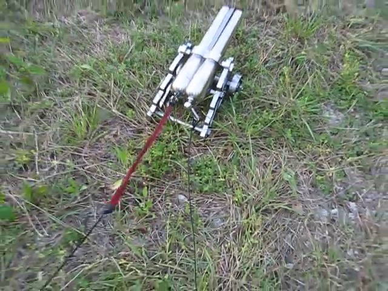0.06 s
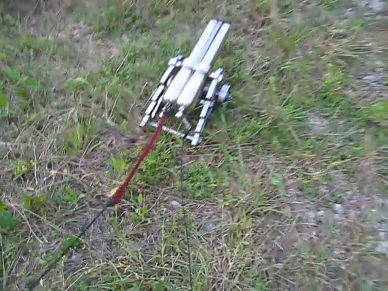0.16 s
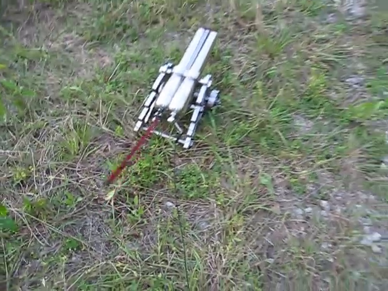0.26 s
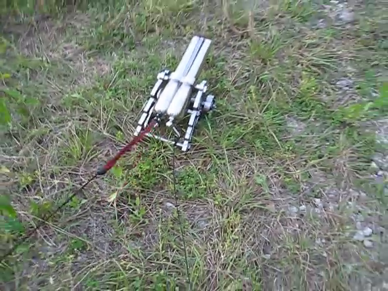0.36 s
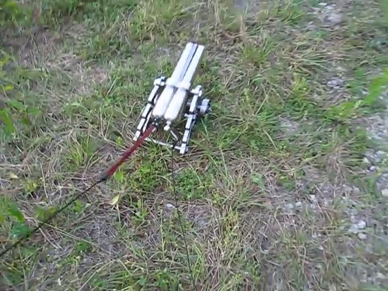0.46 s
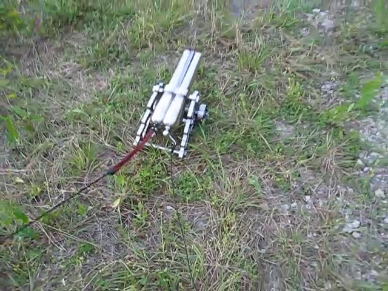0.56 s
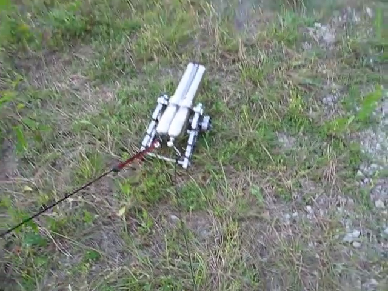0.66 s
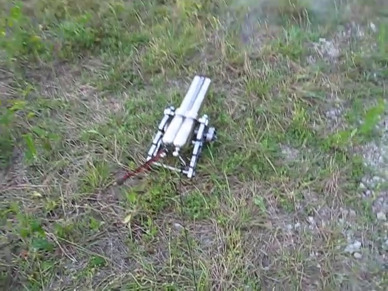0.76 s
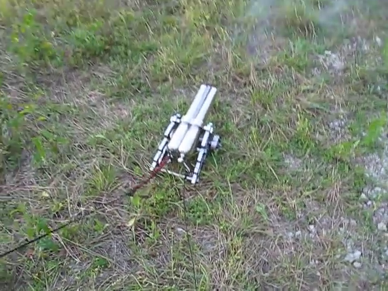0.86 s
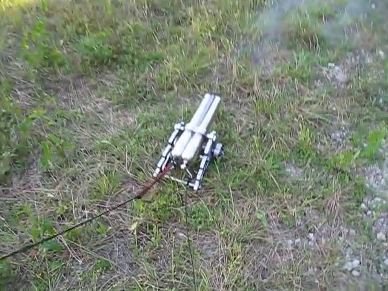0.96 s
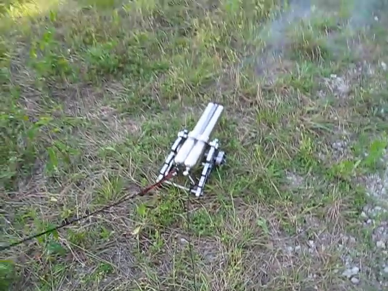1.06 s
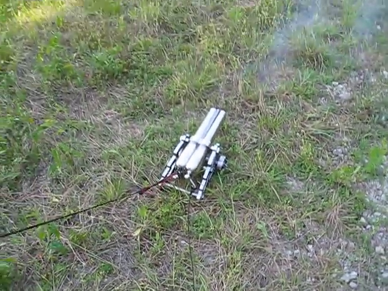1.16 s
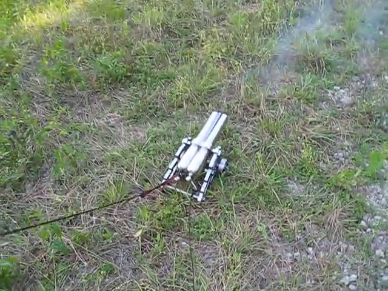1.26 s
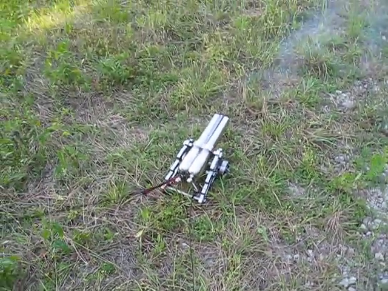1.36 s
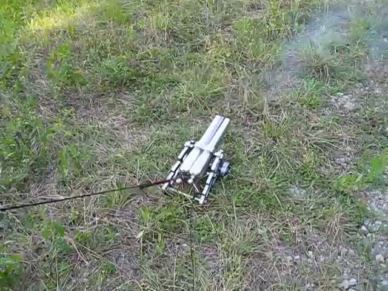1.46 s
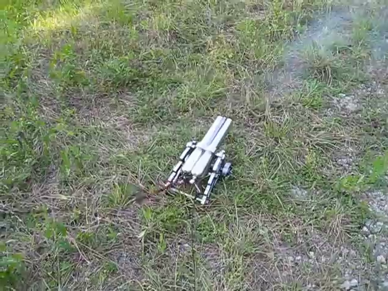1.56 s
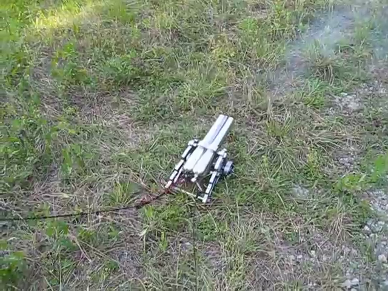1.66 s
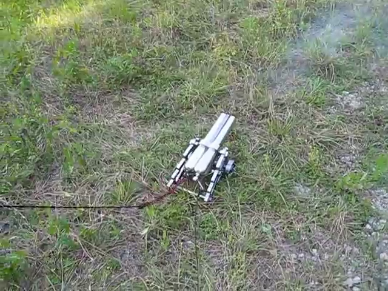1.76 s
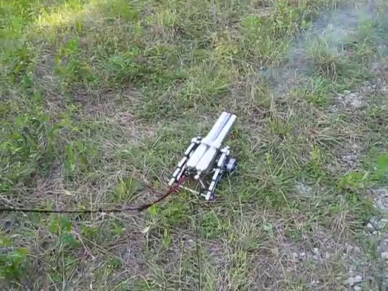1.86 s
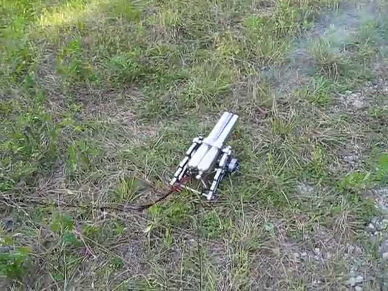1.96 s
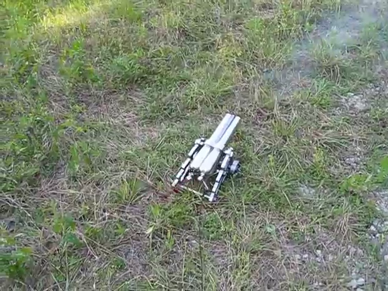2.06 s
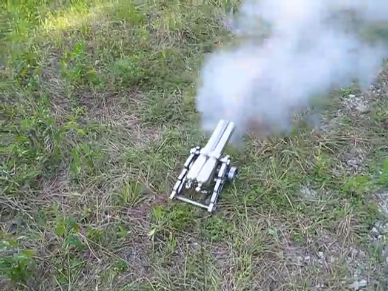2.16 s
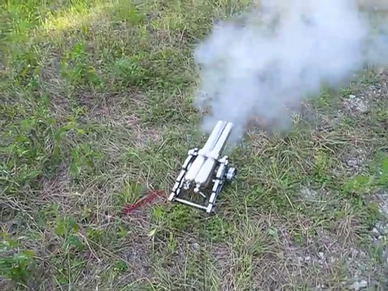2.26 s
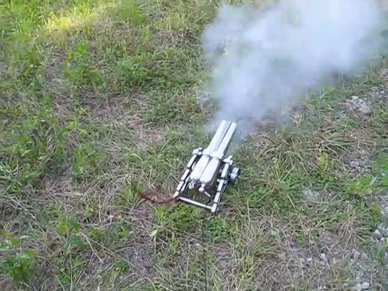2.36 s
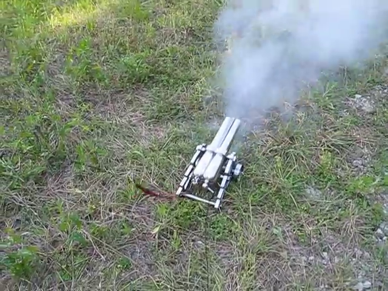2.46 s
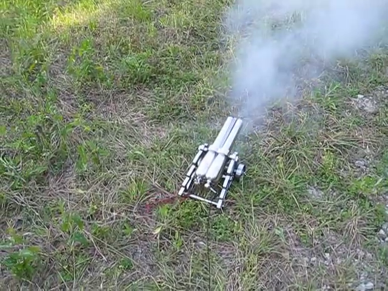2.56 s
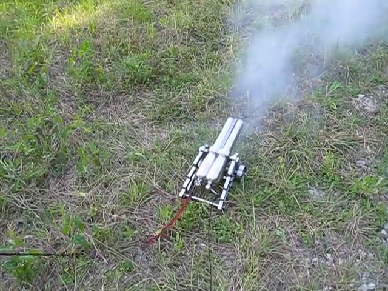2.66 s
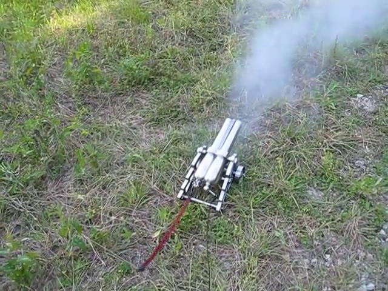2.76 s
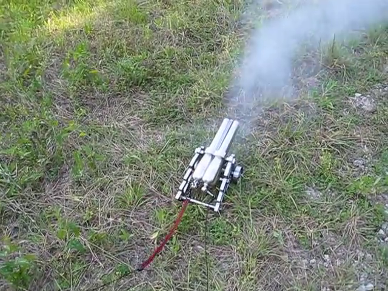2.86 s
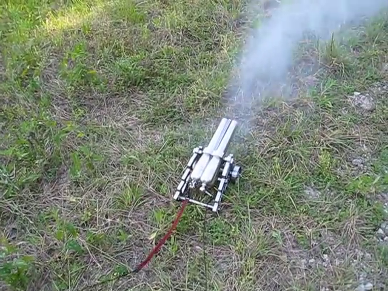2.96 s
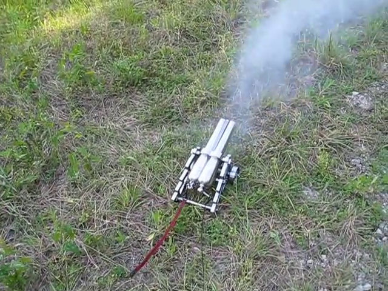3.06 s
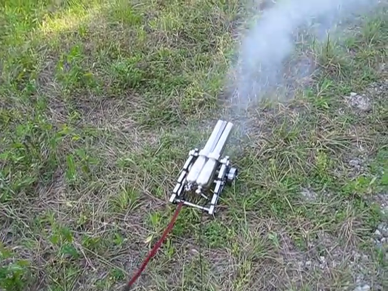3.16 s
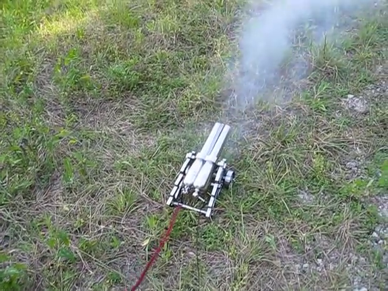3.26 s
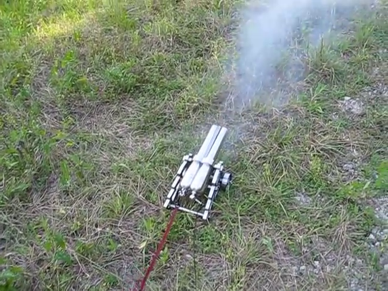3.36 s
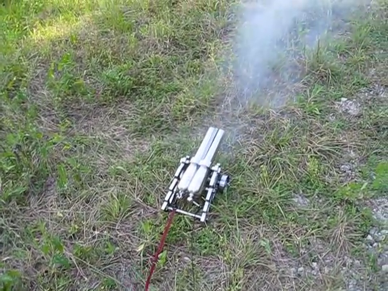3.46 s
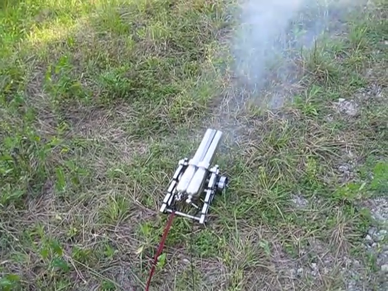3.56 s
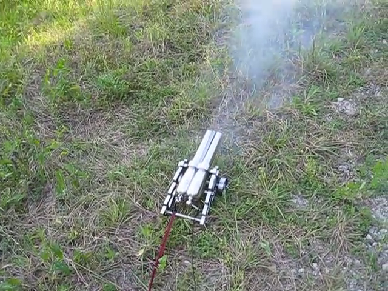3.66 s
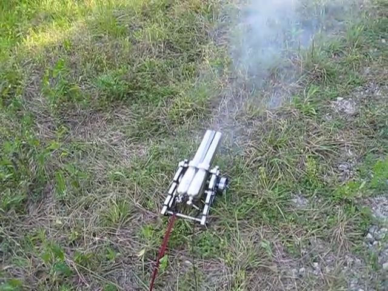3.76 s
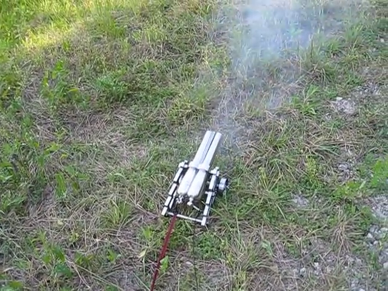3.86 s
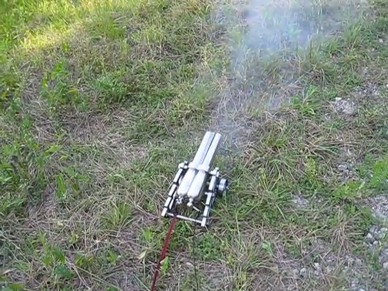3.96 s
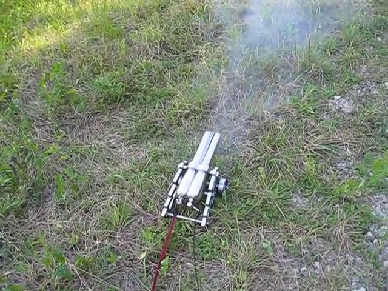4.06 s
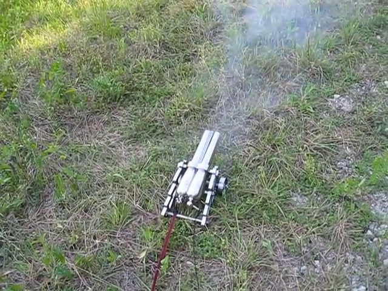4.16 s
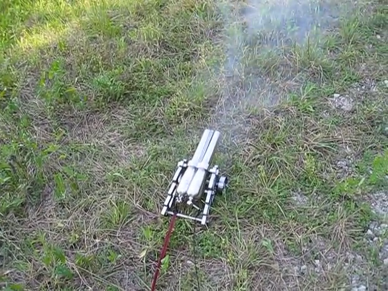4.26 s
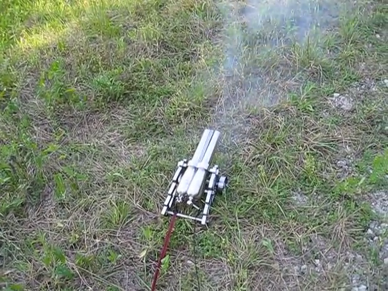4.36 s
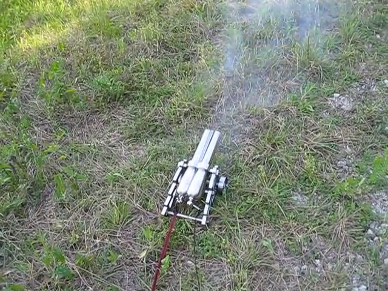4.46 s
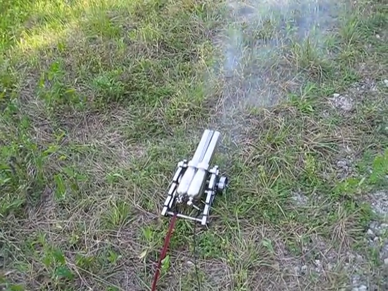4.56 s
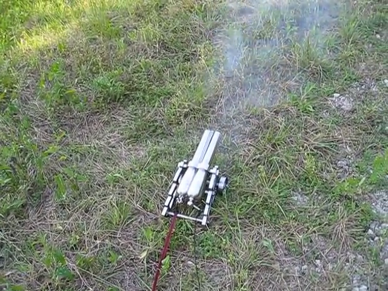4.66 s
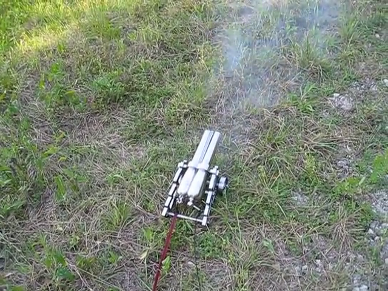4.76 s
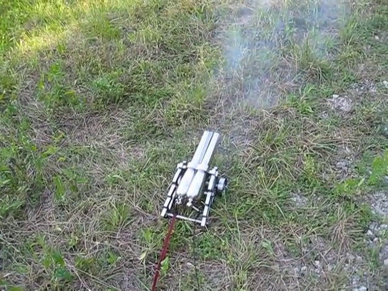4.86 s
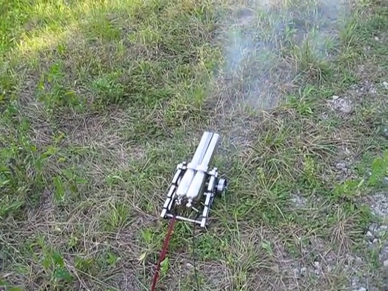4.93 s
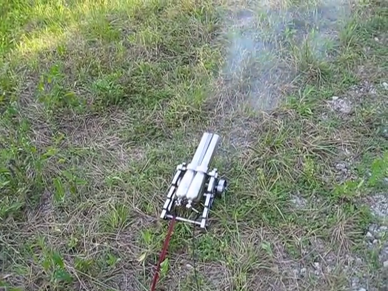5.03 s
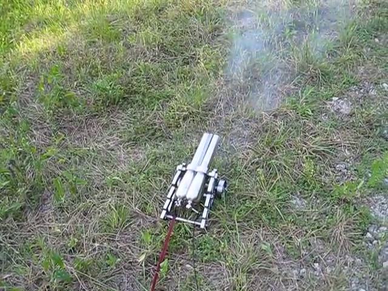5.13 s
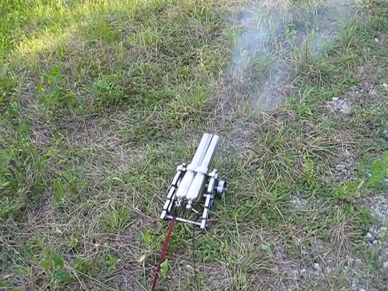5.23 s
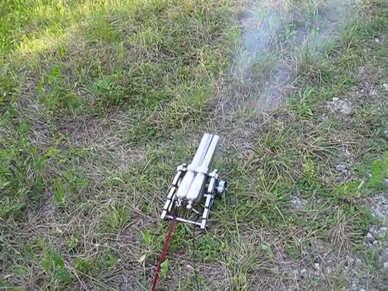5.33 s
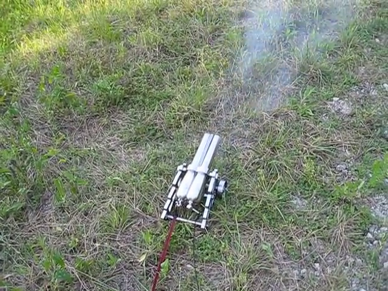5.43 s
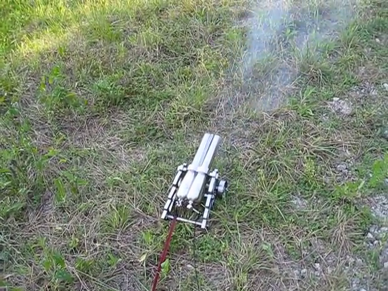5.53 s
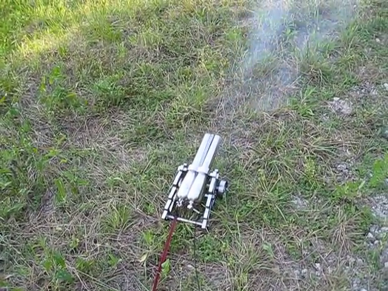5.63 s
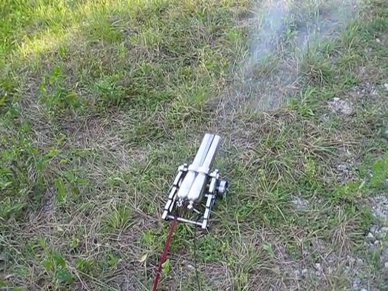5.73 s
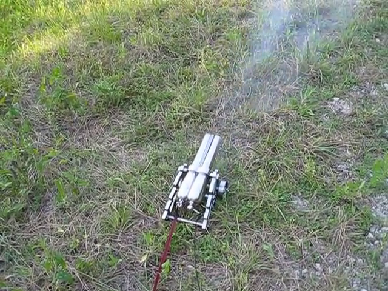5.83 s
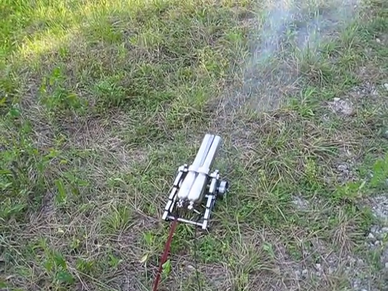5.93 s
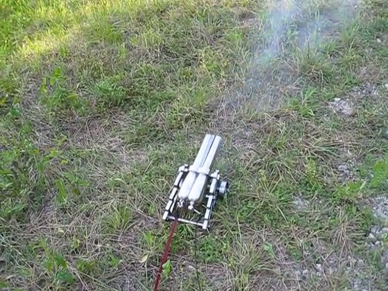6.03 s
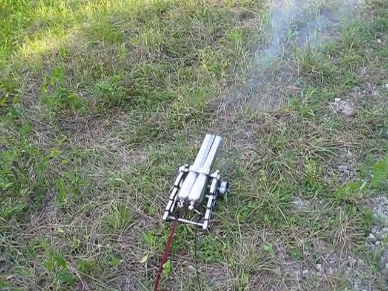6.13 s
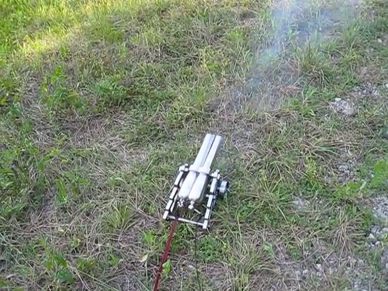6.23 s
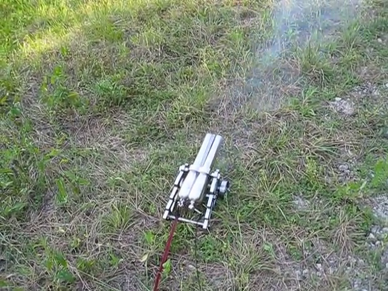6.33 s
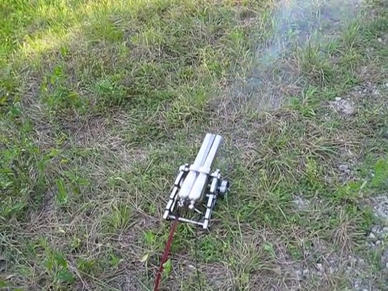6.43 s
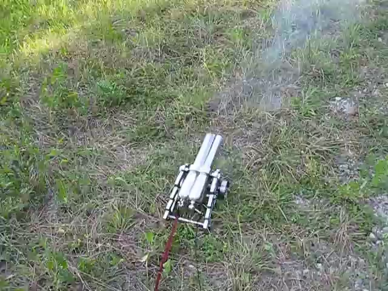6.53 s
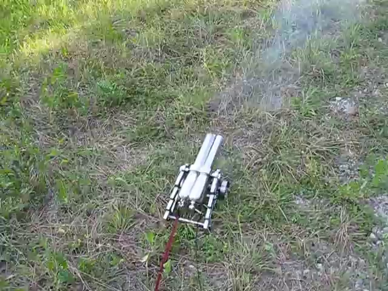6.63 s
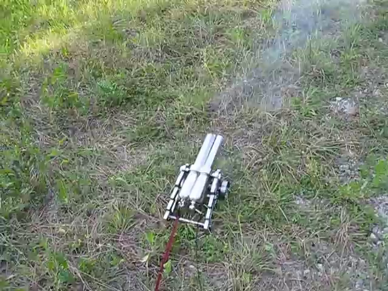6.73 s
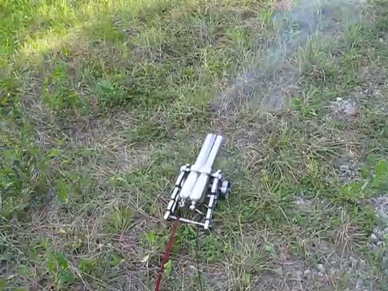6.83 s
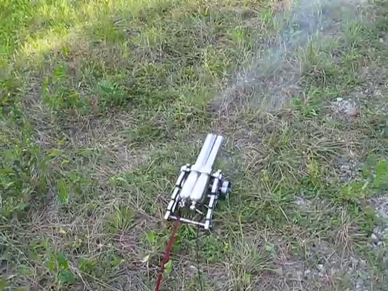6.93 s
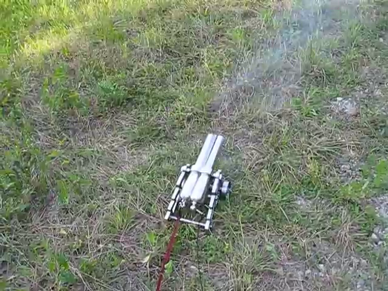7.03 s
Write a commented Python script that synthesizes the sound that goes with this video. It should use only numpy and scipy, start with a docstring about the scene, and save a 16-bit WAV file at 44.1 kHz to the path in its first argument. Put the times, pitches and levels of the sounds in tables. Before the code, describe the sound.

Light clicks and footsteps in grass precede a small cannon's single loud blast, followed by a long rushing echo and faint birds.

```python
"""A hand-held camera clicks and bumps over an outdoor hush as its holder backs away through grass.
Faint birds call. At 2.1 s a small black-powder cannon fires a blank a few steps off: a shock front,
a jet of gas and a ringing barrel. The bang overloads the microphone, then rolls back from the
surrounding trees for two seconds, ever duller. The camera's casing snaps once as the roll fades."""
import sys
import numpy as np
from scipy import signal
from scipy.fft import rfft, irfft
from scipy.io import wavfile
from scipy.ndimage import uniform_filter1d

SR = 44100
rng = np.random.default_rng(int(sys.argv[2]) if len(sys.argv) > 2 else 0)


def unload_audio(sound):
    """Save the sound as a 16-bit wav file, at the path given as the first command line argument."""
    columns = np.transpose(np.atleast_2d(sound))
    # keep every value between -1 and 1, then stretch to whole-number steps
    steps = np.round(np.clip(columns, -1, 1) * 32767)
    wavfile.write(sys.argv[1], SR, steps.astype(np.int16))


N = 312624
T = np.arange(N) / SR
HZ = np.maximum(np.arange(N // 2 + 1) * SR / N, 1)
SHOT_S, TREELINE_S, TREELINE_RISE_S, CREST_S = 2.1062, 2.213, 0.006, 3.157


def undb(db):
    """Decibels to gain."""
    return 10 ** (np.asarray(db) / 20)


def unit(x):
    """Scale to rms 1."""
    return x / np.sqrt(np.mean(x ** 2))


def fade(t, t60_s):
    """Silent before t = 0, then exponential decay."""
    return (t >= 0) * np.exp(-np.log(1000) * np.maximum(t, 0) / t60_s)


def release(t, t60_s):
    """Full level until t = 0, then exponential decay."""
    return fade(np.maximum(t, 0), t60_s)


def onset(t, rise_s):
    """Smooth step from 0 to 1 around t = 0."""
    return (1 + np.tanh(t / rise_s / 2)) / 2


def swell(at_s, half_width_s):
    """Gaussian bump of height 1."""
    return np.exp(-((T - at_s) / half_width_s) ** 2)


def walk(rate_hz):
    """Smooth random wander, rms 1."""
    hop = max(int(SR / rate_hz), 1)
    knots = rng.standard_normal(N // hop + 2)
    path = np.interp(np.arange(N) / hop, np.arange(len(knots)), knots)
    return unit(uniform_filter1d(path, hop // 2 + 1))


def colour(x, spectrum):
    """Shape a white signal to (f/Hz, level/dB) points; rms 1."""
    hz, db = np.transpose(spectrum)
    gain = undb(np.interp(np.log(HZ), np.log(hz), db))
    skirts = np.minimum(HZ / hz[0], 1) ** 2 * np.minimum(hz[-1] / HZ, 1) ** 2
    return unit(irfft(rfft(x) * gain * skirts, N))


def noise(spectrum):
    """Coloured noise, rms 1."""
    return colour(rng.standard_normal(N), spectrum)


def friction(grain):
    """White noise, spikier with more grain."""
    return rng.standard_normal(N) * np.exp(grain * rng.standard_normal(N))


def bands(x, count=18):
    """Overlapping bands that sum to x: (centre/Hz, signal)."""
    centres_hz, spectrum = np.geomspace(60, 17000, count), rfft(x)
    weights = (np.interp(np.log(HZ), np.log(centres_hz), row) for row in np.eye(count))
    return [(hz, irfft(spectrum * weight, N)) for hz, weight in zip(centres_hz, weights)]


def resonance(hz, width_hz):
    """Response of one resonance, gain 1 at its centre."""
    return 1 / (1 + 1j * (HZ / hz - hz / HZ) * hz / width_hz)


def highpass(x, hz, order=4):
    """Butterworth bass cut."""
    return signal.sosfilt(signal.butter(order, hz, "high", fs=SR, output="sos"), x)


def knock(at_s, db, hz, crack_db, t60_s, crack_t60_s, rise_s):
    """A brief crack and one heavily damped ring."""
    out, t = np.zeros(N), T[:SR // 5]
    ring = np.sin(2 * np.pi * hz * t) * fade(t, t60_s) * (1 - np.exp(-t / rise_s))
    crack = undb(crack_db) * rng.standard_normal(len(t)) * fade(t, crack_t60_s)
    start = int(at_s * SR)
    out[start:start + len(t)] = (undb(db) * (2 * ring + crack))[:N - start]
    return out


# Outdoor hush: f/Hz, level/dB
HUSH_SPECTRUM = [(25, -4), (60, -2), (100, 0), (160, -5), (320, -5.5), (520, -1.5), (760, 0.5),
                 (1100, -0.5), (1450, -7.5), (1900, -7.5), (3400, -16), (6000, -19), (10400, -23.5),
                 (17000, -33)]

def hush(level_db=-41.7, flicker_db=0.83):
    """Far traffic and leaves: a steady wash whose bands flicker independently."""
    return sum(band * undb(level_db + flicker_db * walk(9)) for _, band in bands(noise(HUSH_SPECTRUM)))


# Calls: t/s, length/s, start f/Hz, middle f/Hz, end f/Hz, level/dB, roughness/0-1, swell/dB
BIRD_CALLS = [(1.005, .085, 1940, 2080, 1880, -41.5, .35, 0), (1.07, .21, 1890, 1980, 1920, -45, .6, -4),
              (1.53, .18, 3050, 3000, 2800, -53, .9, 0), (1.61, .07, 1900, 1810, 1760, -48.5, .6, 0),
              (4.725, .24, 2490, 2460, 2300, -49, .2, -6), (4.72, .2, 3400, 3310, 3170, -53, .3, 0),
              (4.88, .16, 3200, 3090, 2840, -43.5, .2, 7), (5.26, .11, 2480, 2520, 2470, -49.5, .3, 0),
              (5.41, .18, 3200, 3060, 2780, -52, .3, 4), (5.97, .24, 3020, 2950, 2880, -52, .6, 0)]

def birds(waver=0.052, flutter_db=3):
    """Distant, thin slurred calls; fast pitch jitter makes some hoarse."""
    out, jitter, flutter = np.zeros(N), waver * walk(400), undb(flutter_db * walk(70))
    for at_s, length_s, start_hz, middle_hz, end_hz, db, roughness, swell_db in BIRD_CALLS:
        span = slice(int(at_s * SR), int((at_s + length_s) * SR))
        progress = np.linspace(0, 1, span.stop - span.start)
        slur = np.polyfit([0, 0.5, 1], [start_hz, middle_hz, end_hz], 2)
        hz = np.polyval(slur, progress) * (1 + roughness * jitter[span])
        arch = np.sqrt(np.abs(np.sin(np.pi * progress)))
        out[span] += undb(db + swell_db * (progress - 0.5)) * arch * np.sin(2 * np.pi * np.cumsum(hz) / SR)
    return out * unit(flutter)


# Rustles and scuffs, plus one bright treble burst returned from near trees at 2.677 s: t/s, half-width/s, f/Hz,
# bandwidth/Hz, level/dB
SCUFFS = [(0.734, 0.019, 764, 950, -33), (2.677, 0.013, 3200, 2600, -26.5),
          (3.612, 0.017, 4700, 5970, -39.5), (3.75, .06, 4200, 3500, -49.5),
          (5.934, 0.0069, 3650, 900, -44), (5.956, .005, 3730, 900, -45), (6.198, .009, 1500, 1100, -37.5)]

def rustles():
    """Brief swells of grainy friction, each around its own pitch; the one at 2.677 s is a bright burst of
    treble thrown back by the near trees."""
    spectrum = rfft(friction(grain=0.31))
    return sum(unit(irfft(spectrum * resonance(hz, width_hz) ** 2, N)) * undb(db) * swell(at_s, half_s)
               for at_s, half_s, hz, width_hz, db in SCUFFS)


# Footfalls: t/s, level/dB, rise/s, t60/s
FOOTFALLS = [(.06, -23, .007, 0.1), (.2, -28, 0.018, .14), (.495, -27, 0.036, 0.32),
             (1.51, -40, 0.098, .65)]
# Footfall thud: f/Hz, level/dB
THUD_SPECTRUM = [(25, -4), (60, 2.5), (110, 1.5), (200, -3.5), (330, -11), (600, -21)]
# Feet brushing grass: t/s, length/s, level/dB
GRASS_SWISHES = [(0.052, 0.028, -39), (0.102, 0.22, -53), (.32, 0.447, -47), (.655, 0.02, -45)]
# Brushed grass: f/Hz, level/dB
GRASS_SPECTRUM = [(1200, 10.5), (2500, 6.5), (5000, -4.5), (10000, 0), (16000, -9)]

def footwork(shuffle_db=-47, shuffle_end_s=0.74, swish_rise_s=0.012, stop_t60_s=0.13):
    """Feet shuffle backwards, thud softly and brush through dry grass."""
    thuds = sum(undb(db) * np.exp(np.minimum(T - at_s, 0) / rise_s) * release(T - at_s, t60_s)
                for at_s, db, rise_s, t60_s in FOOTFALLS)
    shuffle = undb(shuffle_db) * release(T - shuffle_end_s, stop_t60_s)
    swishes = sum(undb(db) * onset(T - at_s, swish_rise_s) * release(T - at_s - length_s, stop_t60_s)
                  for at_s, length_s, db in GRASS_SWISHES)
    blades = colour(friction(grain=0.89), GRASS_SPECTRUM)
    return noise(THUD_SPECTRUM) * np.hypot(thuds, shuffle) + blades * swishes


# Hand and foot bumps: t/s, level/dB, f/Hz
SOFT_BUMPS = [(0.0538, -14, 168), (.062, -16.5, 332), (0.2019, -16, 230), (0.349, -28, 109),
              (.494, -17.5, 186), (.550, -24, 246)]

def bumps(ring_cycles=4.3):
    """Soft contacts of hand and feet: low rings, little crack."""
    return sum(knock(at_s, db, hz, crack_db=-33, t60_s=ring_cycles / hz, crack_t60_s=0.02, rise_s=0.0018)
               for at_s, db, hz in SOFT_BUMPS)


# Camera body clicks: t/s, level/dB, f/Hz, relative crack/dB
BODY_CLICKS = [(.0785, -23, 600, -14), (.0853, -16.5, 600, -9), (.1025, -20, 1100, -20),
               (.1153, -2, 930, -7), (.1154, -13, 2010, -22), (.1775, -5.5, 1160, -34),
               (.1885, -20, 1200, -27), (.1955, -22, 1100, -25), (.2095, -21, 1300, -22),
               (.3315, -13, 1030, -12), (.3668, -22, 850, -18), (.7840, -19, 1030, -22),
               (.9518, -11.5, 1780, -17), (.9529, -15, 740, -20), (.9920, -20, 1010, -25),
               (6.3236, -37, 5000, 10.5)]

def camera_clicks(ring_cycles=5.24):
    """The plastic body clicks, too small to radiate bass."""
    clicks = sum(knock(at_s, db, hz, crack_db, ring_cycles / hz, crack_t60_s=0.0014, rise_s=0.0003)
                 for at_s, db, hz, crack_db in BODY_CLICKS)
    return highpass(clicks, hz=298)


# Casing modes: f/Hz, level/dB, t60/s
CASING_MODES = [(1650, -3.5, .004), (2000, -17, .014), (1400, -20, .014), (3700, -15, .006),
                (5000, -26, .004), (6200, -30, .004)]

def casing_snap(at_s=4.0535, crack_db=-31):
    """A small stiff part of the casing flips and rings."""
    ring = sum(knock(at_s, db, hz, crack_db, t60_s, crack_t60_s=0.003, rise_s=0.0003)
               for hz, db, t60_s in CASING_MODES)
    return highpass(ring, hz=1150)


# Echo bass: f/Hz, level/dB
RUMBLE_SPECTRUM = [(25, -28), (50, -9), (90, 2.5), (150, 0), (230, -1), (320, -8), (450, -17.5)]

def rumble(scatter, treeline, booms):
    """Bass of the echoes: a plateau until the crest, a few booms, a long tail."""
    body = undb(-34) * release(T - CREST_S, t60_s=2.6)
    tail = undb(-37.5) * release(T - CREST_S, t60_s=7.7)
    return colour(scatter, RUMBLE_SPECTRUM) * np.hypot(np.hypot(body, tail) * treeline, booms)


# Echoes off trees: f/Hz, level/dB
TREE_SPECTRUM = [(300, -10), (420, -5), (600, 3), (850, 3), (1200, 1.5), (1450, -3), (1900, -1),
                 (2250, -5.5), (2900, -4), (3600, -10.5), (5000, -12.5), (8000, -13), (12000, -21.5),
                 (17000, -19.5)]

def tree_rush(scatter, age_s, near_db=3, far_db=-3, far_wood_s=2.835, air_db_per_s=17, flicker_db=0.27):
    """Near trees return more treble than the far wood; air absorbs more with path and frequency."""
    treble_db = near_db + (far_db - near_db) * onset(T - far_wood_s, rise_s=0.18)
    rush = 0
    for hz, band in bands(colour(scatter, TREE_SPECTRUM)):
        lift_db = treble_db * np.clip(np.log(hz / 900), 0, 1)
        loss_db = air_db_per_s * age_s * (hz / 5000) ** 1.68
        rush += band * undb(lift_db - loss_db + flicker_db * walk(27.9))
    return rush


# Tree clumps answering together: t/s, half-width/s, boom level/dB, rush lift/dB
TREE_CLUMPS = [(2.347, .012, -31, 1.5), (2.448, 0.032, -37.5, 1.5), (2.648, 0.051, -27, 0),
               (2.815, .03, -25, 2), (2.979, 0.022, -25, 1.5), (3.6, .03, -38, 1)]

def echo_roll(echoes_per_s=9000, swell_db_per_s=7, fall_db_per_s=23, wander_db=0.5):
    """The field scatters the bang, then countless trees return it: a swell, a crest, a lingering fall."""
    age_s, past_crest_s = np.maximum(T - SHOT_S, 0), T - CREST_S
    treeline = onset(T - TREELINE_S, TREELINE_RISE_S)
    field = undb(-21.5) * fade(age_s, t60_s=1)
    crest = undb(-11) / np.hypot(undb(-swell_db_per_s * past_crest_s), undb(fall_db_per_s * past_crest_s))
    distant_woods = undb(-24.5) * release(past_crest_s, t60_s=5.8)
    woods = np.hypot(crest, distant_woods) * treeline
    booms = sum(undb(db) * swell(at_s, half_s) for at_s, half_s, db, _ in TREE_CLUMPS)
    clumps_db = sum(db * swell(at_s, half_s) for at_s, half_s, _, db in TREE_CLUMPS)
    envelope = np.hypot(woods, field) * undb(clumps_db + wander_db * walk(18))
    trunks = (rng.random(N) < echoes_per_s / SR) * rng.standard_normal(N)
    foliage = 0.79 * rng.standard_normal(N)
    scatter = unit(trunks) + foliage
    roll = tree_rush(scatter, age_s) * envelope + rumble(scatter, treeline, booms)
    return roll * np.clip(age_s / 0.01, 0, 1)


# Distinct echoes: t/s, level/dB, f/Hz, relative crack/dB
DISTINCT_ECHOES = [(2.146, -20, 152, -40), (2.148, -5.5, 850, -14), (2.154, -18, 900, -15),
                   (2.280, -19, 1400, -12), (2.606, -12, 900, -27), (2.617, -5, 850, -29),
                   (2.972, -17, 131, -40), (3.259, -11, 800, -40)]

def single_echoes(ring_cycles=4.7):
    """Single reflections stand out of the roll as short knocks."""
    return sum(knock(at_s, db, hz, crack_db, ring_cycles / hz, crack_t60_s=0.0036, rise_s=0.00042)
               for at_s, db, hz, crack_db in DISTINCT_ECHOES)


# Muzzle blast: f/Hz, level/dB
BLAST_SPECTRUM = [(70, -18), (140, 5.5), (330, -9.5), (550, -0.5), (1200, -2.5), (3000, -2.5), (3900, -7),
                  (5000, -3.5), (7500, -8), (11000, -10.5), (13000, -22), (17000, -25)]
# Modes of the barrel and its air column: f/Hz, level/dB, t60/s
BARREL_MODES = [(150, -40, 0.074), (565, 1.5, 0.042), (1257, -6, 0.052), (2800, -13, .07),
                (7730, -15, 0.088)]

def cannon(primer_lead_s=0.0012, shock_s=0.00057, jet_rise_s=0.0015, jet_hold_s=0.0031, gas_t60_s=0.018):
    """The primer spits, shock and gas leave the muzzle, the barrel rings, near ground scatters it."""
    t = T - SHOT_S
    age_s = np.maximum(t, 0)
    primer = undb(-11) * fade(t + primer_lead_s, gas_t60_s)
    # overpressure, then suction
    shock = undb(-5) * (t >= 0) * (1 - age_s / shock_s) * np.exp(-age_s / shock_s)
    jet = undb(5) * (1 - np.exp(-age_s / jet_rise_s)) * release(t - jet_hold_s, gas_t60_s)
    ground = undb(-19) * fade(t, t60_s=0.2)
    ring = sum(undb(db) * np.sin(2 * np.pi * hz * age_s) * fade(t, t60_s) for hz, db, t60_s in BARREL_MODES)
    return shock + noise(BLAST_SPECTRUM) * (primer + jet + ground) + ring


def scene():
    """Handling noises, the shot and its echoes over the quiet field; mono."""
    handling = camera_clicks() + bumps()
    shot = cannon() + echo_roll() + single_echoes()
    return (handling + shot + casing_snap() + footwork() + rustles() + birds() + hush())[None]


# Microphone housing resonances: f/Hz, bandwidth/Hz, lift/dB
HOUSING_MODES = [(2860, 120, 1.5), (4345, 110, 2.5), (4790, 130, 3), (5180, 120, 3), (5630, 120, 2),
                 (6550, 160, 2), (7320, 200, 2), (9350, 120, 2), (10490, 130, 2), (11160, 130, 2)]

def record(dry, shelf_db=-2.5, shelf_hz=3500, coupling_hz=55, top_hz=17250):
    """The housing colours the treble; the bang clips at full scale; both band edges roll off."""
    housing = 1 + sum((undb(db) - 1) * resonance(hz, width_hz) for hz, width_hz, db in HOUSING_MODES)
    shelf = undb(shelf_db * HZ ** 2 / (HZ ** 2 + shelf_hz ** 2))
    clipped = np.clip(irfft(rfft(dry) * housing * shelf, N), -1, 1)
    coupled = highpass(clipped, coupling_hz, order=1)
    return signal.sosfilt(signal.ellip(10, 0.2, 90, top_hz, fs=SR, output="sos"), coupled)


dry = scene()
out = record(dry)
unload_audio(out)
```